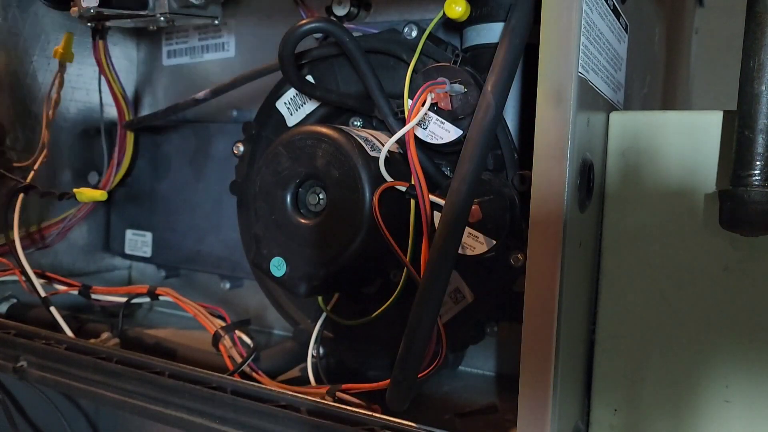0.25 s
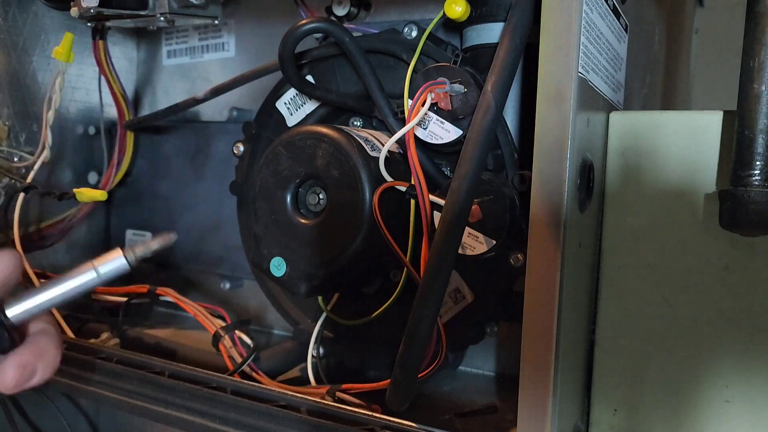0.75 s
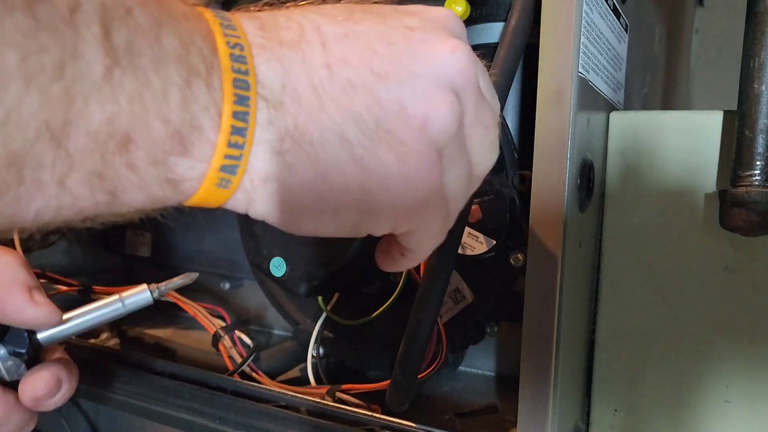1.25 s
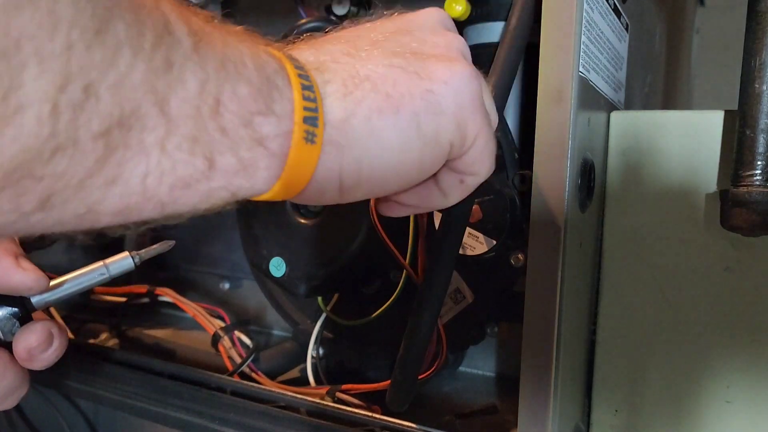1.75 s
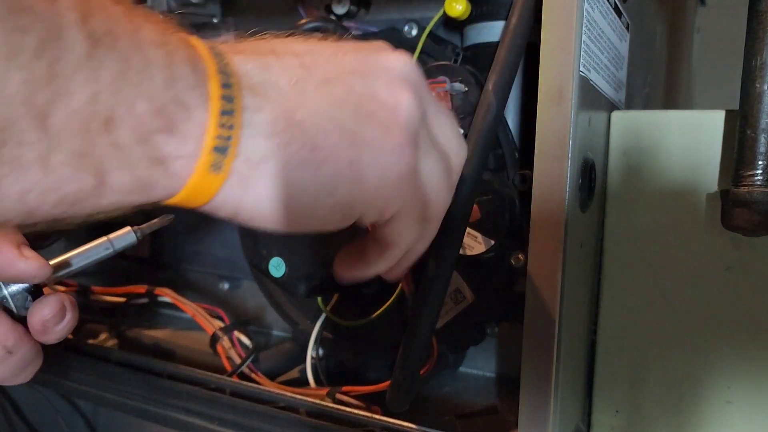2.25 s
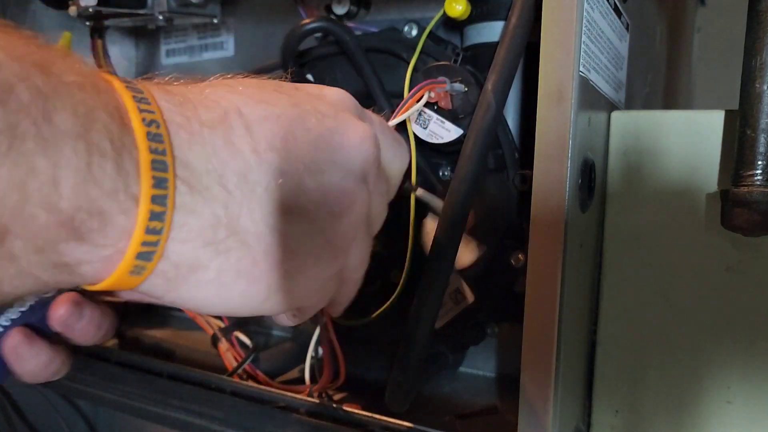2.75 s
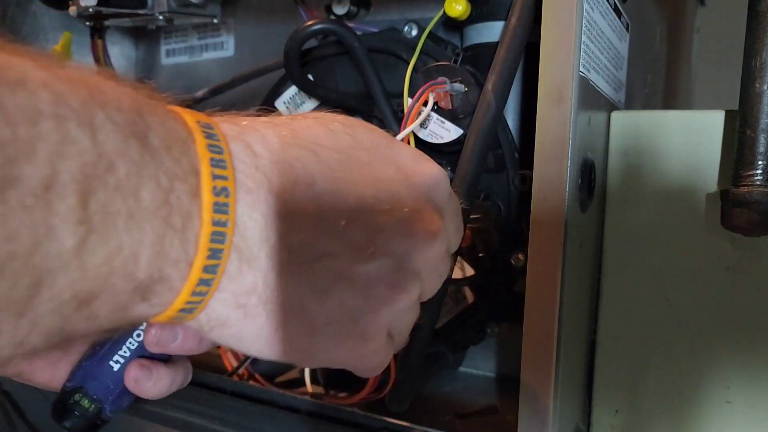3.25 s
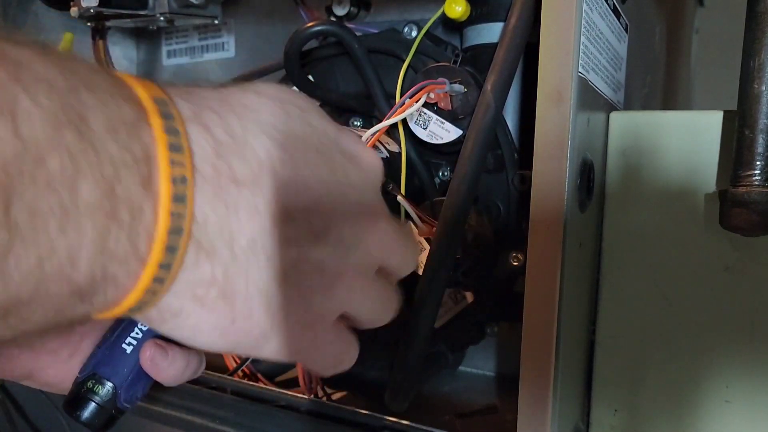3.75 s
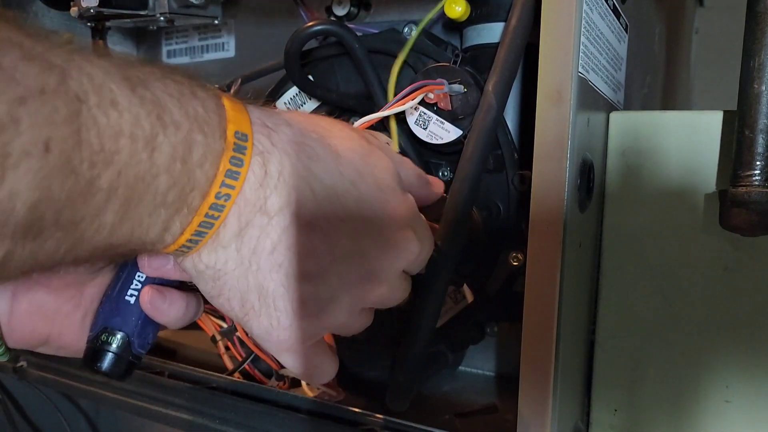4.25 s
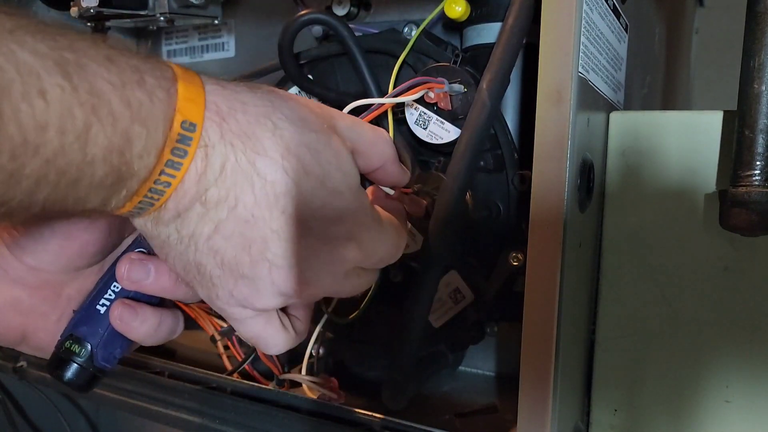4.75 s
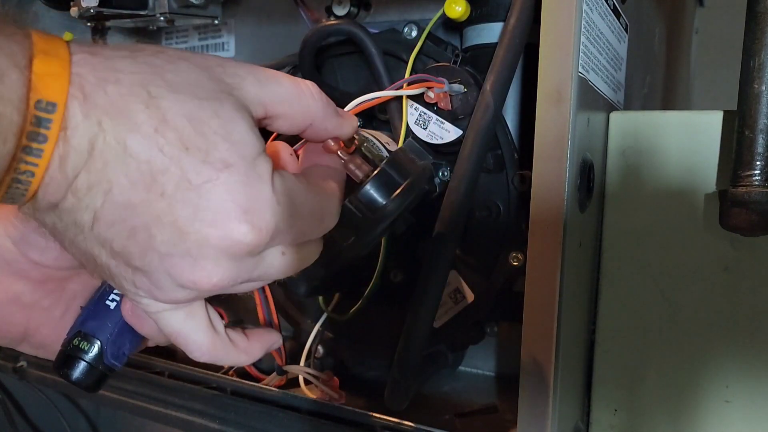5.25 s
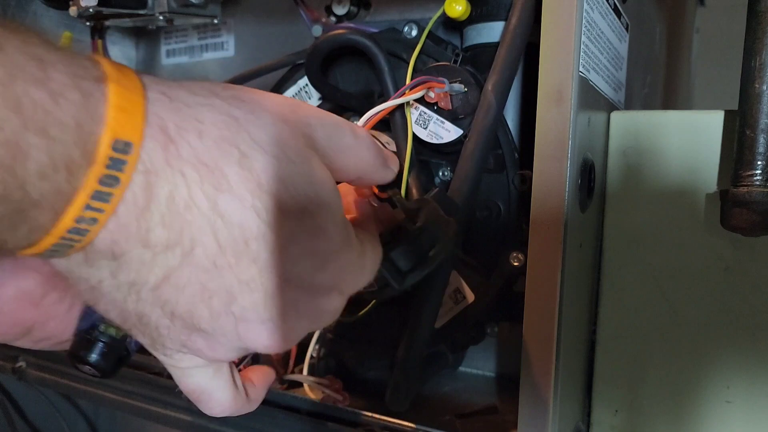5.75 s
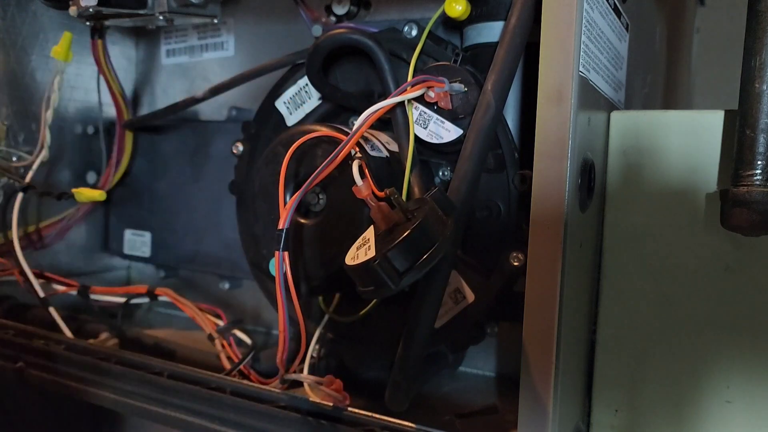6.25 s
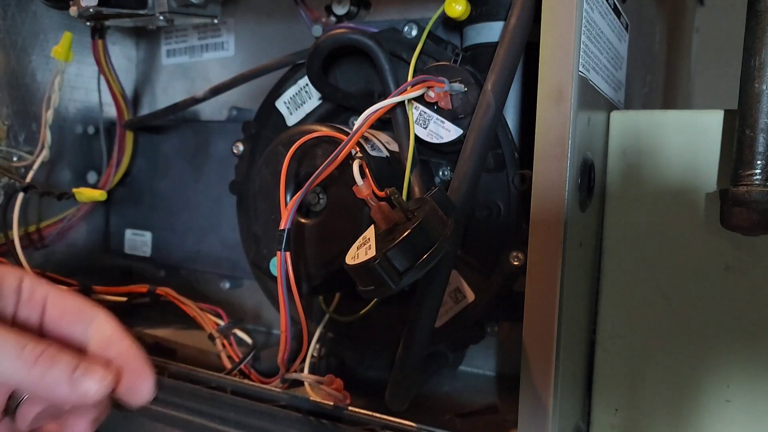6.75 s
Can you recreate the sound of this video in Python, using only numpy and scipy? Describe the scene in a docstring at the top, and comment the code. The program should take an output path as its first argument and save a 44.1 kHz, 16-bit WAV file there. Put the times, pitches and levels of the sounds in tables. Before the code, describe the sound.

Hands work wires and push-on terminals loose in a furnace: hollow knocks, small clicks, rubbing and scuffs above a soft low airy hum.

```python
"""Inside the steel cabinet of a furnace, a hand works wires and push-on terminals loose.
A plastic switch case knocks on the blower housing and sets the panels ringing; terminals tick.
Wires rub, rustle, slip through the fingers and squeak twice; a sleeve brushes past at the end.
A low, resonant hum goes on underneath. Contacts are cracks with ringing sines and dense echoes;
the rubbing sounds and the hum are coloured noise, and the squeaks are gliding sines."""
import sys
import numpy as np
from scipy import signal
from scipy.fft import rfft, irfft
from scipy.io import wavfile

SR = 44100
rng = np.random.default_rng(int(sys.argv[2]) if len(sys.argv) > 2 else 0)


def unload_audio(sound):
    """Save the sound as a 16-bit wav file, at the path given as the first command line argument."""
    columns = np.transpose(np.atleast_2d(sound))
    # keep every value between -1 and 1, then stretch to whole-number steps
    steps = np.round(np.clip(columns, -1, 1) * 32767)
    wavfile.write(sys.argv[1], SR, steps.astype(np.int16))


N = 308700
TIME = np.arange(N) / SR
RING_SIZE, RUN_IN = 2 ** 16, 512  # samples: one contact's sound, and the space kept ahead of it


# knocks on the housing; where a blow lands decides how much each part answers (levels are relative):
# (t/s, strength level/dB, contact time t/s, struck part f/Hz, its ring level/dB, cabinet ring level/dB,
#  switch case level/dB, panel boom level/dB, frame thud level/dB)
KNOCK_EVENTS = [(0.384, -34, 0.0016, 700, -21.5, 0.5, -4, 1.5, 3.5),
                (0.798, -30.5, 0.00088, 1460, -18, 1.5, -4, 4.5, 1),
                (1.177, -32.5, 0.002, 616, -19, -2, -3, 8.5, 0.5),
                (2.404, -44, 0.0019, 646, -28, 4.5, 9, 2.5, -20),
                (2.673, -30.5, 0.00016, 1450, -16, 0, -27.5, 6, 1.5),
                (2.845, -46.5, 0.00029, 1040, -10, 2, 12.5, 3, 16),
                (2.885, -33, 0.00037, 706, -22, -0.5, 8, 4, 3.5),
                (3.267, -25, 0.00036, 1420, -29, .5, -16, -9, -16.5),
                (3.403, -32, 0.0021, 704, -7, 7, 6.5, -11, -13.5),
                (3.921, -48, 0.00055, 736, -17, -5.5, 9, 12, 1.5),
                (3.978, -36, 0.000098, 860, -30, 0, -5.5, 1, 12),
                (4.054, -33, 0.00025, 890, -45.5, 0, -7, -0.5, -6.5),
                (4.32, -22.5, 0.00025, 1210, -28, -1, -24, 4, -19),
                (4.6298, -22, 0.0022, 642, -5, -2.5, 2, 1, -21.5),
                (4.921, -37.5, 0.00065, 746, -25, -2, 11, -0.5, 8),
                (5.14, -30.5, 0.00038, 1040, -10.5, -8.5, -7, -17.5, -32),
                (5.694, -23.5, 0.0036, 783, -10, 1.5, 3.5, 3, -29.5)]
# colour shared by all knocks: (f/Hz, level/dB)
KNOCK_TONE = [(30, 7), (60, 40), (110, 49), (250, 44.5), (480, 38), (750, 40.5), (1450, 41.5), (2050, 37),
              (2600, 35.5), (3600, 37.5), (5200, 39.5), (7000, 36), (10000, 35), (14000, 37)]


def knocks():
    """The plastic case hits the blower housing: a strong crack, and the steel rings."""
    return contacts(KNOCK_EVENTS, KNOCK_TONE, crack=0.47, chatter_s=0.005, modes_db=-2.0,
                    scatter_db=2.5, part_db=-17.5, flex_s=0.00321, delay_s=0.00073)


# light ticks of terminals and tool (levels are relative):
# (t/s, strength level/dB, contact time t/s, struck part f/Hz, its ring level/dB, cabinet ring level/dB)
TICK_EVENTS = [(0.4447, -37.5, 0.000094, 1960, -51, -2), (0.56, -40.5, 0.00019, 2540, -41.5, -5.5),
               (0.9013, -63, .0001, 4200, -46, -1.5), (1.1848, -42, 0.00038, 2130, -48, -5.5),
               (1.7542, -39, 0.00082, 1830, -47.5, -8), (1.8, -45, 0.00089, 1910, -72, -6),
               (2.0043, -38, 0.00037, 1820, -35, -3.5), (2.0498, -32.5, 0.0015, 1820, -38, -0.5),
               (2.9642, -24.5, 0.0012, 1860, -38, -12.5), (3.236, -56, 0.00022, 3610, -60, 14.5),
               (3.4449, -46.5, 0.00053, 2350, -49, 3.5), (3.7291, -31.5, 0.00076, 1980, -35, -7.5),
               (4.5063, -26.5, 0.00047, 2230, -54, -9), (4.556, -45.5, 0.000023, 5730, -33, -10),
               (4.9078, -37.5, 0.00042, 1900, -39, -4), (5.0486, -45.5, 0.00047, 2100, -45, -1),
               (5.1935, -41, 0.00056, 2090, -36, -3.5), (5.9613, -61.5, 0.000073, 7200, -43.5, -8),
               (6.0364, -71, 0.000085, 4540, -66, 4), (6.3137, -63, 0.000039, 4130, -51.5, -19),
               (6.3842, -46, 0.00057, 2070, -46, -5)]
# colour shared by all ticks: (f/Hz, level/dB)
TICK_TONE = [(60, 18), (300, 4.9), (700, 34.8), (1100, 36.5), (2050, 37.4), (2700, 34.2), (5000, 37.4),
             (7500, 38.3), (10000, 31), (14000, 28)]


def ticks():
    """Small metal parts touch: less crack, more chatter, and hardly any ring from the switch case."""
    case_db, boom_db, thud_db = -24, 0, 0
    light = [(*row, case_db, boom_db, thud_db) for row in TICK_EVENTS]
    return contacts(light, TICK_TONE, crack=0.11, chatter_s=0.0048, modes_db=-7.5,
                    scatter_db=7.0, part_db=5.5, flex_s=0.0022, delay_s=0.00054)


# ringing tones of the sheet-steel panels and blower housing: (f/Hz, relative level/dB, time to fade 60 dB t/s)
PANEL_MODES = [(61, 22.5, 3.9), (117.7, 17, 0.83), (180.1, 14, 0.46), (187.8, 4.5, 0.8), (251.9, 19, 0.41),
               (334, 12.5, 0.23), (447.6, 16.5, 0.3), (542, 15.5, 0.29), (713, 15.5, 0.22),
               (822, 14.5, 0.35), (1034, 11.5, 0.25), (1130, 13, 0.13), (1312, -1.5, 0.043),
               (1226, -12, 0.068), (1388, 8, 0.16), (1552, 15.5, 0.11), (1900, 15, 0.33), (1924, 4, 0.6),
               (2105, 14, 0.3)]
# ringing tones of the pressure switch's plastic case: (f/Hz, relative level/dB, time to fade 60 dB t/s)
CASE_MODES = [(708, 14.5, 0.11), (867, 8.5, 0.064), (1028, 5, 0.055), (1730, 3.5, 0.06), (1992, 15, 0.053)]
# lean of the contacts to one side: (f/Hz, level/dB up on the left and down on the right)
LEFT_LEAN = [(100, 0), (500, 1), (1000, 0), (2000, 1.74), (4500, -0.1), (8000, 0.5), (13000, 1)]


def contacts(rows, colour, crack, chatter_s, modes_db, scatter_db, part_db, flex_s, delay_s):
    """Each contact is a crack and a few ms of chatter; part, switch case and cabinet ring after it."""
    t, hz = TIME[:RING_SIZE], bins(RING_SIZE)
    out = np.zeros((2, N + RING_SIZE))
    tails = [rfft(cabinet_tail(build_s=0.0043)) for _ in range(8)]
    panels, case = mode_sines(PANEL_MODES), mode_sines(CASE_MODES)
    # bending waves in sheet steel are slower at low pitch, so the lows arrive later
    lateness_s = flex_s / (1 + (hz / 900) ** 2)
    flex = np.exp(-2j * np.pi * np.cumsum(lateness_s) * hz[1])
    lean = from_db(at_hz(LEFT_LEAN, hz) * [[1], [-1]])
    chatter_fade = np.exp(-t / chatter_s)
    chatter_fade /= np.linalg.norm(chatter_fade)

    for k, row in enumerate(rows):
        s, strength_db, contact_s, part_hz, part_level_db, ring_db, case_db, boom_db, thud_db = row
        chatter = rng.standard_normal((2, RING_SIZE)) * chatter_fade
        chatter[0, 0] += crack
        cabinet = tails[k % len(tails)] + from_db(modes_db) * struck(panels, scatter_db)
        blow = to_ports(chatter) + from_db(ring_db) * cabinet
        blow = blow + from_db(case_db) * struck(case, scatter_db)
        blow = blow * hardness(strength_db, contact_s, boom_db, thud_db, colour)

        # the struck part's own tone fades by 60 dB in 36 cycles
        part_fade = from_db(part_level_db + part_db - 60 * t * part_hz / 36)
        part = part_fade * np.sin(2 * np.pi * part_hz * t)
        sound = irfft((blow + rfft(part)) * flex * lean)
        start = round((s + delay_s) * SR) - RUN_IN
        out[:, start:start + RING_SIZE] += np.roll(sound, RUN_IN, axis=1)
    return out[:, :N]


def hardness(strength_db, contact_s, boom_db, thud_db, colour):
    """A long, soft contact loses treble, a heavy one adds bass, and small parts make the treble uneven."""
    hz = bins(RING_SIZE)
    boom_hz, boom_octaves, thud_hz = 328, 0.56, 149  # boom's centre and width; frame moves below thud_hz
    boom = np.exp(-.5 * (np.log2((hz + 1) / boom_hz) / boom_octaves) ** 2)
    thud = np.exp(-.5 * (hz / boom_hz) ** 2) / np.sqrt(1 + (hz / thud_hz) ** 2)
    # 12 dB per octave are lost above 1 / contact time
    force_db = strength_db - 12 * np.log2(np.hypot(1, hz * contact_s))
    body_db = boom_db * boom + thud_db * thud
    uneven_db = 2.8 * ripple(spacing_hz=200) * hz / (hz + 900)
    return causal(force_db + body_db + at_hz(colour, hz) + uneven_db)


def causal(db):
    """Minimum-phase response of a dB curve, so that nothing sounds before the contact."""
    cepstrum = irfft(np.log(from_db(db)))
    half = len(cepstrum) // 2
    return np.exp(rfft(np.r_[cepstrum[:1], 2 * cepstrum[1:half]], 2 * half))


def ripple(spacing_hz):
    """Chance peaks and dips of a small irregular object along frequency, spread about 1."""
    knots = rng.standard_normal(400)
    return 1.8 * np.interp(bins(RING_SIZE) / spacing_hz, np.arange(len(knots)), knots)


def mode_sines(table):
    """Each way a part can ring is one decaying sine."""
    t = TIME[:RING_SIZE]
    hz, db, t60 = np.transpose(table)[:, :, None]
    fade = from_db(-60 * t / t60)
    size = from_db(db) * 2 / fade.sum(axis=1, keepdims=True)
    return size * fade * np.sin(2 * np.pi * hz * t)


def struck(modes, scatter_db):
    """Stereo spectrum of modes hit at a new spot, each with a new strength and sign."""
    shape = (2, len(modes))
    strengths = from_db(scatter_db * rng.standard_normal(shape))
    signs = rng.choice([-1, 1], shape)
    return to_ports((strengths * signs) @ modes)


# how long the echoes in the cabinet last: (f/Hz, time to fade 60 dB t/s)
ECHO_FADE = [(80, 1), (210, 0.26), (560, 0.57), (1470, 0.42), (3900, 0.2), (8000, 0.15), (15000, 0.091)]


def cabinet_tail(build_s):
    """Dense echoes between the steel walls: they build up, come in uneven lumps and die sooner in the treble."""
    t, hz = TIME[:RING_SIZE], bins(RING_SIZE)
    lumps = from_db(2.0 * drift(rate=250)[:RING_SIZE])
    white = to_ports(rms_one(lumps * rng.standard_normal((2, RING_SIZE))))
    centres, out = np.geomspace(60, 15000, 9), 0
    # nine overlapping bands, each with its own fade
    for centre, share in zip(centres, np.eye(len(centres))):
        build_up = 1 - np.exp(-t / (build_s + 1 / centre))
        fade = from_db(-60 * t / at_hz(ECHO_FADE, centre)) * build_up
        band = irfft(white * at_hz(np.c_[centres, share], hz))
        out = out + band * fade / np.linalg.norm(fade)
    return out


# brief scuffs of fingers on wires (levels are relative):
# (middle t/s, level/dB, centre f/Hz, skin hiss level/dB, time from middle to 17 dB down t/s)
SCUFF_EVENTS = [(0.2794, -47.5, 7440, -83, 0.19), (0.862, -33.5, 3030, -64, 0.089),
                (1.895, -39, 2980, -98, 0.027), (2.238, -35, 2440, -84, 0.04),
                (2.305, -43, 7000, -100, 0.026), (2.426, -33.5, 2540, -106, 0.04),
                (2.848, -34, 3220, -69, 0.18), (3.1, -52, 7660, -96, 0.026), (4.031, -22, 3460, -56, 0.073),
                (5.112, -46, 2720, -66, 0.016), (5.467, -41, 3180, -82, 0.035),
                (5.627, -40, 7800, -96, 0.047)]
# colour of skin on insulation, shape only; also used by rustle(): (f/Hz, level/dB)
SKIN_TONE = [(2000, -53), (5000, 1), (9000, -8), (16000, -8)]


def scuffs(octaves):
    """A finger slips along a wire: a short swell of noise around one pitch, with the hiss of skin on top."""
    white, out = to_ports(rng.standard_normal((2, N))), np.zeros((2, N))
    skin = coloured(SKIN_TONE)
    for s, level_db, hz, skin_db, length_s in SCUFF_EVENTS:
        band = np.exp(-.5 * (np.log2((bins(N) + 1) / hz) / octaves) ** 2)
        slip = from_db(level_db - 33) * rms_one(irfft(white * band, N))
        out += swell(s, length_s) * (slip + from_db(skin_db) * skin)
    return out * from_db(2.0 * drift(rate=47))


# separate pulls on the wires: (middle t/s, relative level/dB, time from middle to 17 dB down t/s)
WIRE_PULLS = [(0.306, -79.5, 0.11), (0.5, -65, 0.14), (0.845, -74, 0.33), (1.928, -75, 0.23),
              (2.47, -75.5, 0.43), (2.9, -63.5, 0.36), (3.42, -67.5, 0.15), (3.944, -76, 0.3),
              (4.482, -66, 0.28), (5.075, -72, 0.24), (5.612, -78.5, 0.46), (6.035, -74.5, 0.073),
              (6.28, -69, 0.27)]
# colour of the rustle, shape only: (f/Hz, level/dB)
RUSTLE_TONE = [(300, -15.5), (1000, -12.5), (2100, 5.5), (2900, -3.5), (4500, -3.5), (7800, -2.5),
               (9500, -14.5), (16000, -19.5)]


def rustle():
    """Pulled wires slide over each other and through the fingers: noise, catches and a hiss of skin."""
    sliding = strokes(WIRE_PULLS)
    flicker = from_db(4 * drift(rate=35))
    # stiff insulation catches and lets go
    crackles = from_db(-17.5) * crackle(from_db(at_hz(RUSTLE_TONE, bins(N))))
    wires = flicker * (coloured(RUSTLE_TONE, grain_db=-1.0) + crackles)
    skin = from_db(-27.5 + 1.1 * drift(rate=26)) * coloured(SKIN_TONE)
    return sliding * (wires + skin)


# how hard the wires press on the housing, as the level of their rubbing: (t/s, relative level/dB)
WIRE_PRESS = [(0.0, -58), (0.33, -58), (1.11, -48), (1.56, -57), (2.67, -48), (2.86, -51), (3.02, -58.5),
              (3.88, -52), (4.19, -50), (4.82, -51.5), (5.15, -42), (5.4, -53), (6.71, -58.5), (7.0, -56)]
# colour of the rubbing, shape only: (f/Hz, level/dB)
RUB_TONE = [(60, -2.5), (115, 5.5), (160, -1), (260, 3.5), (400, -16.5), (600, -31.5), (1200, -21.5),
            (2500, -45.5), (6000, -77)]


def rub():
    """Wires rub on the housing as they press on it, and shudder against it after each knock."""
    press_db, = in_time(WIRE_PRESS)
    shudder = sum(from_db(row[1] - 21.5) * surge(row[0], peak_s=0.029) for row in KNOCK_EVENTS)
    return np.hypot(from_db(press_db - 1.5), shudder) * coloured(RUB_TONE)


# the hand leans on the blower or lets go: (t/s, level/dB)
PANEL_SWAYS = [(0.698, -52.5), (1.102, -48), (2.7, -57), (3.85, -60), (4.88, -57), (5.661, -50)]


def sway():
    """The back panel sways under the hand: a slow surge of noise in a deep resonance."""
    swaying = sum(from_db(db) * surge(s, peak_s=0.18) for s, db in PANEL_SWAYS)
    return swaying * noise(resonance(hz=65, width=7))


# strokes of the sleeve as the arm draws back:
# (middle t/s, relative level/dB, time from middle to 17 dB down t/s)
SLEEVE_STROKES = [(6.28, -68.5, 0.077), (6.495, -56, 0.079), (6.714, -48.5, 0.13), (6.854, -42, 0.087),
                  (7.0, -44, 0.061)]
# colour of the cloth, shape only: (f/Hz, level/dB)
SLEEVE_TONE = [(410, -14), (700, -10), (777, -5.5), (1250, -8.5), (1750, -3), (1970, -2.5), (3370, -4),
               (4610, -2), (7290, -3), (9110, -9), (15200, -10.5), (16000, -31)]


def sleeve():
    """Cloth slides past close by: many fibre slips and a few snags, swelling with the speed of the arm."""
    snags = from_db(-15.5) * crackle(from_db(at_hz(SLEEVE_TONE, bins(N))))
    cloth = coloured(SLEEVE_TONE, grain_db=2.5) + snags
    return strokes(SLEEVE_STROKES) * from_db(1.9 * drift(rate=73)) * cloth


# two faint squeaks of insulation under tension, a list of rows for each: (t/s, f/Hz, relative level/dB)
SQUEAK_GLIDES = [
    [(3.82, 11500, -103), (3.872, 12550, -84), (3.916, 12680, -95), (3.938, 12270, -76), (3.96, 11990, -90)],
    [(4.18, 10220, -100), (4.208, 9791, -82), (4.26, 9700, -81), (4.278, 9597, -92), (4.29, 10520, -71)],
]


def squeaks():
    """Insulation sticks and slips very fast: a thin, slightly unsteady glide."""
    out = np.zeros(N)
    for rows in SQUEAK_GLIDES:
        hz, level_db = in_time(rows)
        from_end_s = np.minimum(TIME - rows[0][0], rows[-1][0] - TIME)
        sounding = np.clip(from_end_s / .02, 0, 1)
        unsteady_hz = hz + 35 * drift(rate=170)
        glide = np.sin(2 * np.pi * np.cumsum(unsteady_hz) / SR)
        out += sounding * from_db(level_db - 3.0) * glide
    return out


# resonances of the air rumbling in the ducts: (f/Hz, half-width f/Hz, rms level/dB)
DUCTS = [(74.5, 12, -61.5), (123.3, 10, -66), (184, 53, -78.5), (280.2, 13.7, -60.5), (310, 75, -68.5),
         (658.5, 64, -65), (699, 116, -72.5)]
# colour of the soft hiss, shape only: (f/Hz, level/dB)
AIR_TONE = [(20, -12), (45, -9.5), (80, 6), (160, -22), (300, -4.5), (450, -18), (700, -11.5),
            (1000, -15.5), (2000, -22.5), (4000, -35), (8000, -36), (9500, -49), (16000, -42.5)]


def hum():
    """Moving air excites the low resonances of the ducts, over a soft hiss."""
    ducts = sum(from_db(db) * noise(resonance(hz, width)) for hz, width, db in DUCTS)
    return ducts + from_db(-67) * coloured(AIR_TONE)


def strokes(rows):
    """Strokes of a moving hand or arm, each with its own level and length, added up."""
    return sum(from_db(db) * swell(s, length_s) for s, db, length_s in rows)


def swell(s, length_s):
    """A stroke speeds up and slows down around its middle."""
    return np.exp(-2 * ((TIME - s) / length_s) ** 2)


def surge(s, peak_s):
    """Something pushed builds up to 1, then dies away."""
    age = np.maximum(TIME - s, 0) / peak_s
    return age * np.exp(1 - age)


def crackle(gain):
    """Sparse little catches of uneven size, on average 45 a second, each a few ms of slips; rms 1."""
    catches = (rng.random(N) < 45 / SR) * rng.exponential(1, N)
    slips = signal.lfilter([1], [1, -np.exp(-1 / (0.0024 * SR))], catches + 1e-18)
    return rms_one(irfft(to_ports(slips * rng.standard_normal((2, N))) * gain, N))


def noise(gain, grain_db=0):
    """Stereo noise of rms 1 with a gain per frequency; grain makes single instants stronger or weaker."""
    sizes = from_db(grain_db * np.minimum(rng.exponential(1, N), 4))
    return rms_one(irfft(to_ports(rng.standard_normal((2, N)) * sizes) * gain, N))


def coloured(tone, grain_db=0):
    """Noise with the colour of a table."""
    return noise(from_db(at_hz(tone, bins(N))), grain_db)


def resonance(hz, width):
    """Gain per frequency of a resonance with steep skirts."""
    return 1 / (1 + ((bins(N) - hz) / width) ** 2)


def drift(rate):
    """Slow chance with spread 1, smoothed above the rate in Hz."""
    return rms_one(irfft(rfft(rng.standard_normal(N)) / (1 + (bins(N) / rate) ** 2), N))


# likeness of left and right: (f/Hz, correlation)
SIDE_LIKENESS = [(60, 0.98), (150, 0.98), (280, 0.91), (550, 0.42), (1100, 0.064), (2200, 0.034),
                 (4500, 0.033), (14000, .01)]


def to_ports(pair):
    """Spectra of two unrelated sounds as left and right: alike in the bass, apart in the treble."""
    alike = at_hz(SIDE_LIKENESS, bins(pair.shape[-1]))
    mid, side = rfft(pair)
    return np.sqrt((1 + alike) / 2) * mid + np.sqrt((1 - alike) / 2) * side * [[1], [-1]]


def from_db(db):
    """Decibels to gain."""
    return 10 ** (np.asarray(db) / 20)


def rms_one(x):
    """Scale to rms 1."""
    return x / np.sqrt(np.mean(x ** 2) + 1e-20)


def in_time(rows):
    """Each column of a curve at every sample."""
    s, *columns = np.transpose(rows)
    return [np.interp(TIME, s, c) for c in columns]


def at_hz(points, hz):
    """Read a table on a log-frequency axis."""
    f, value = np.transpose(points)
    return np.interp(np.log(hz + 1e-9), np.log(f), value)


def bins(size):
    """Frequencies of a spectrum of so many samples."""
    return np.fft.rfftfreq(size, 1 / SR)


def scene():
    """Knocks, ticks, wires and a sleeve over the hum."""
    hits = from_db(-6.0) * knocks() + from_db(-6.5) * ticks()
    wires = sway() + rub() + rustle() + scuffs(octaves=0.36) + squeaks()
    return hits + wires + sleeve() + hum()


def record(dry):
    """The treble is cut steeply above 16150 Hz."""
    return signal.sosfilt(signal.ellip(10, .1, 70, 16150, fs=SR, output="sos"), dry)


dry = scene()
out = record(dry)
unload_audio(out)
```